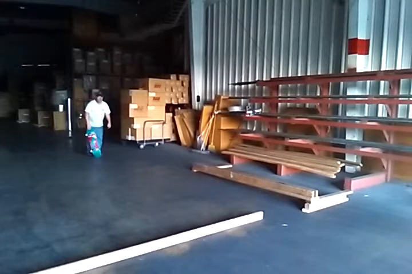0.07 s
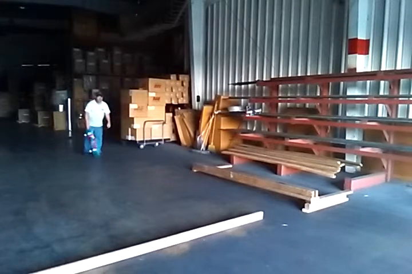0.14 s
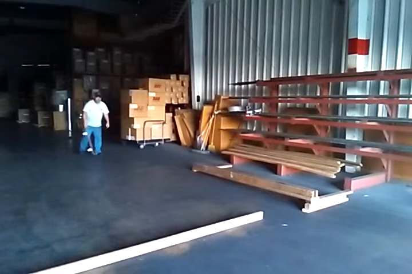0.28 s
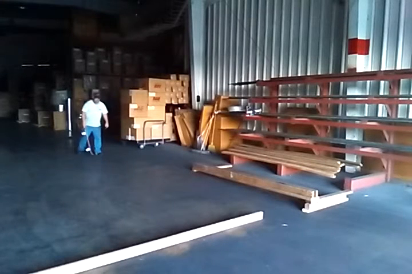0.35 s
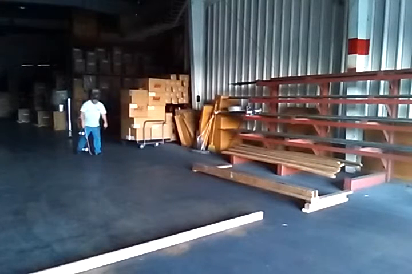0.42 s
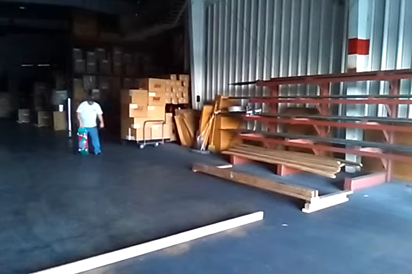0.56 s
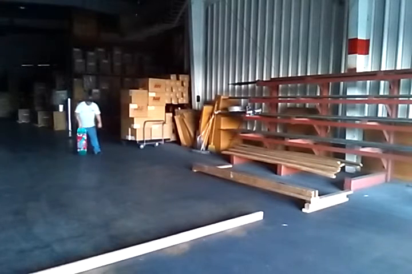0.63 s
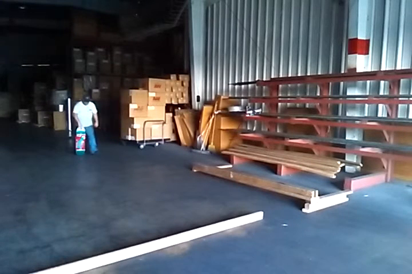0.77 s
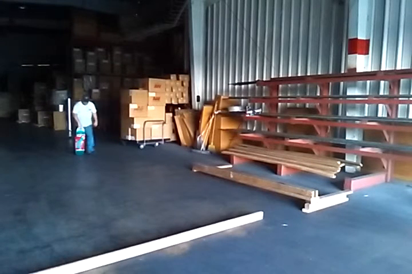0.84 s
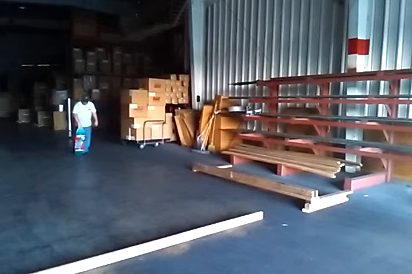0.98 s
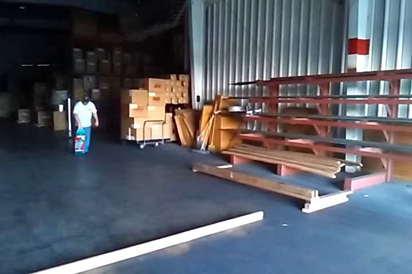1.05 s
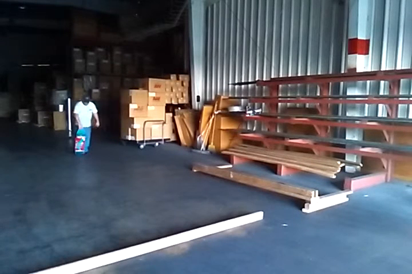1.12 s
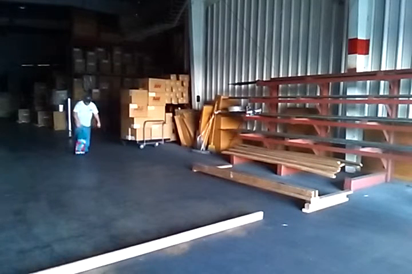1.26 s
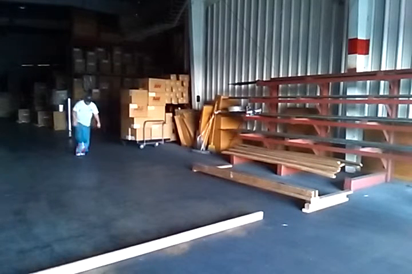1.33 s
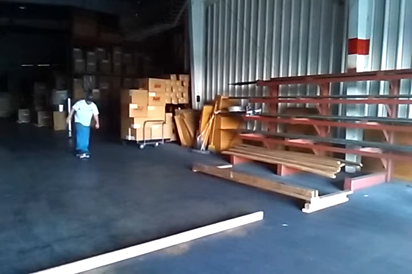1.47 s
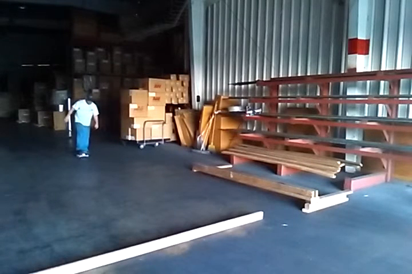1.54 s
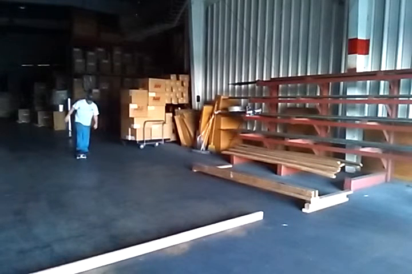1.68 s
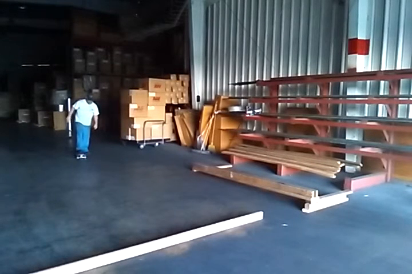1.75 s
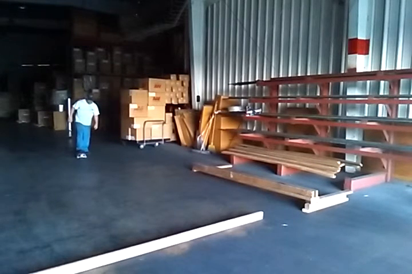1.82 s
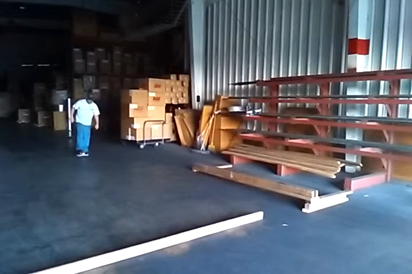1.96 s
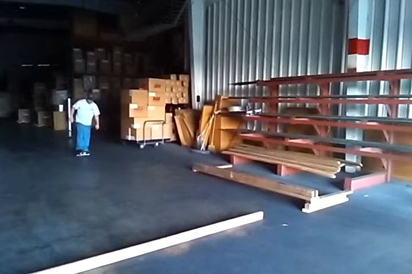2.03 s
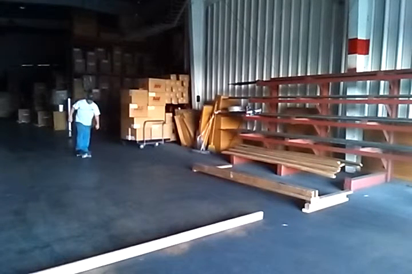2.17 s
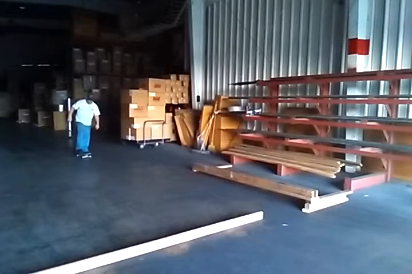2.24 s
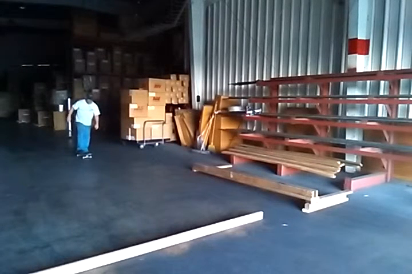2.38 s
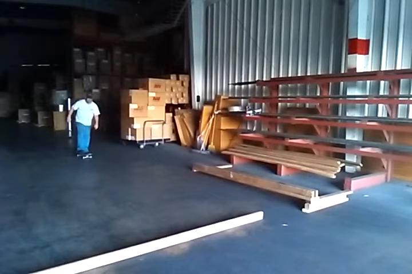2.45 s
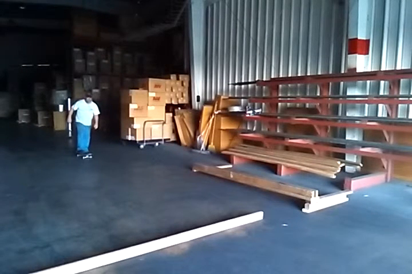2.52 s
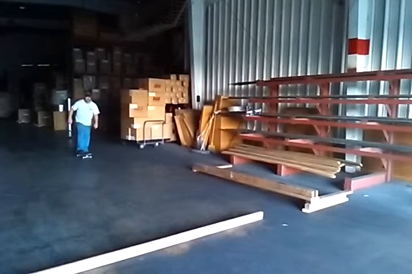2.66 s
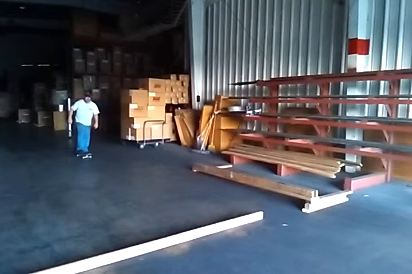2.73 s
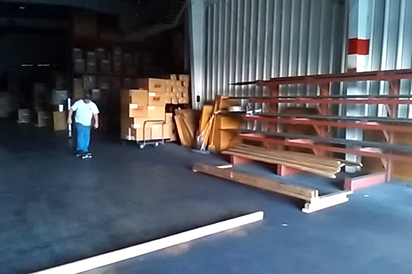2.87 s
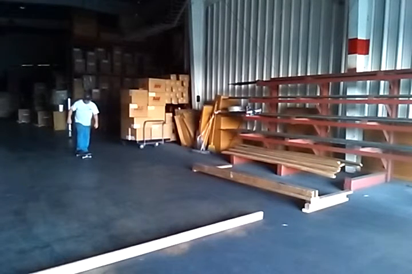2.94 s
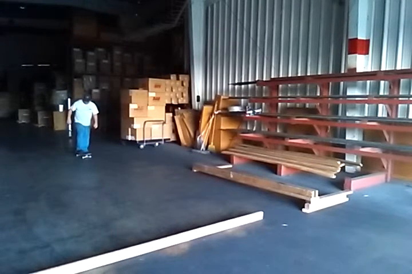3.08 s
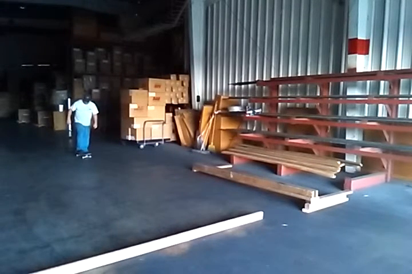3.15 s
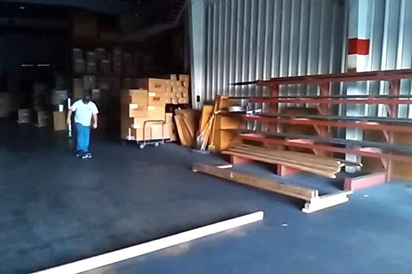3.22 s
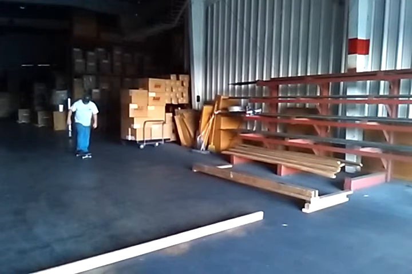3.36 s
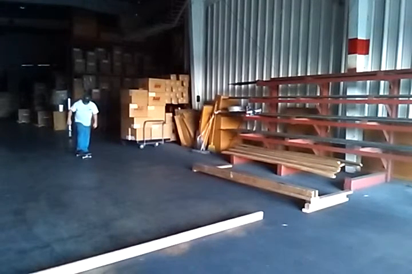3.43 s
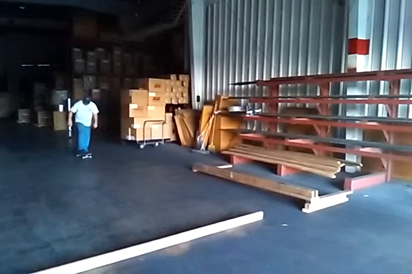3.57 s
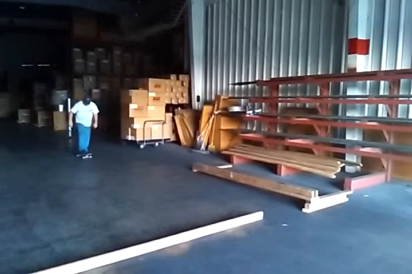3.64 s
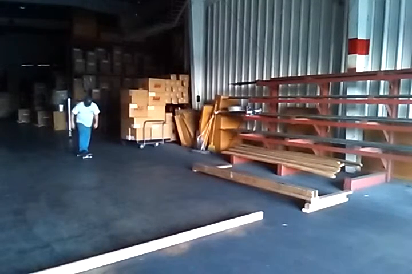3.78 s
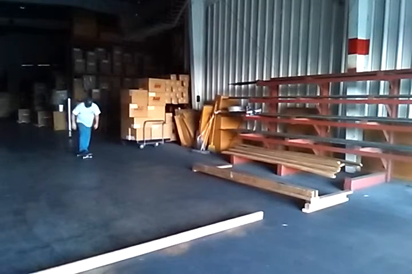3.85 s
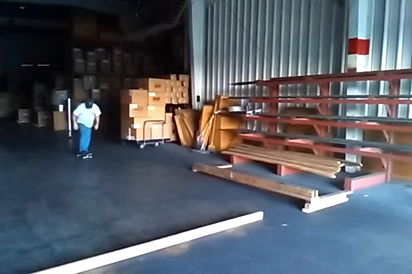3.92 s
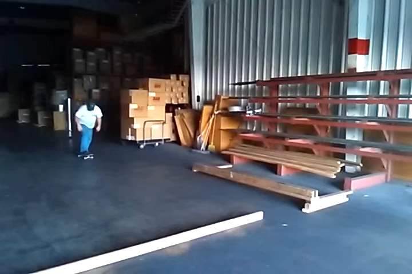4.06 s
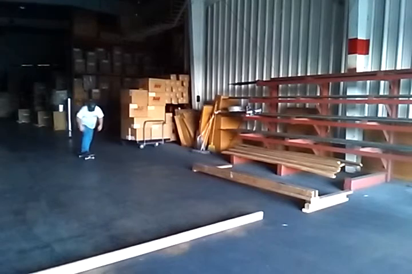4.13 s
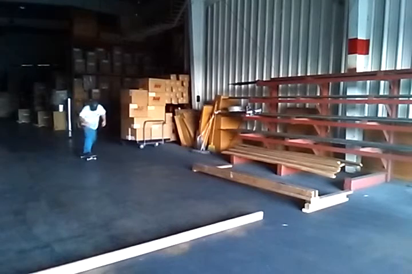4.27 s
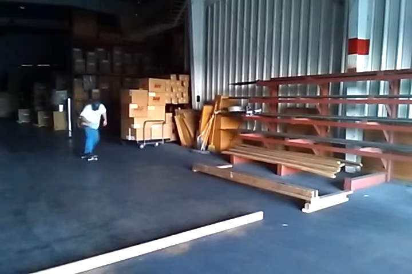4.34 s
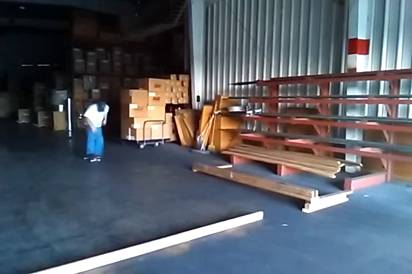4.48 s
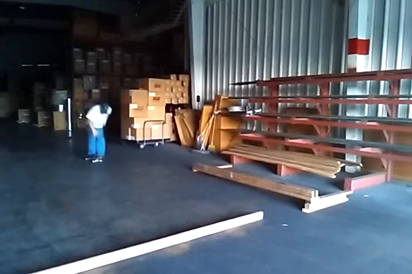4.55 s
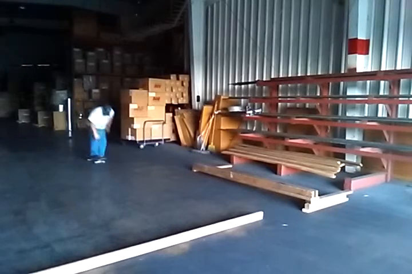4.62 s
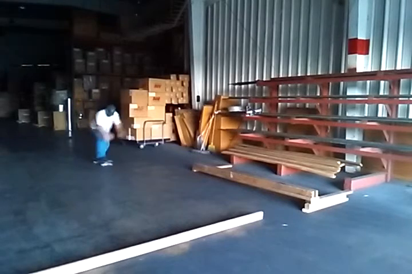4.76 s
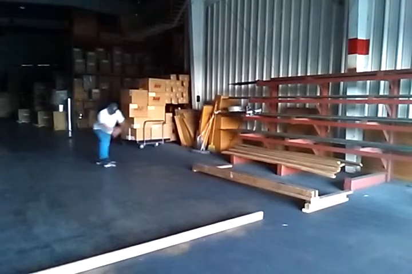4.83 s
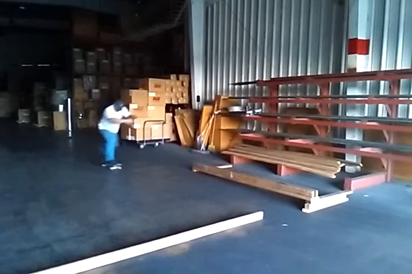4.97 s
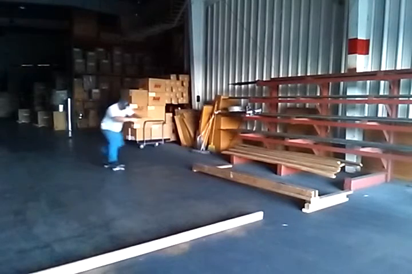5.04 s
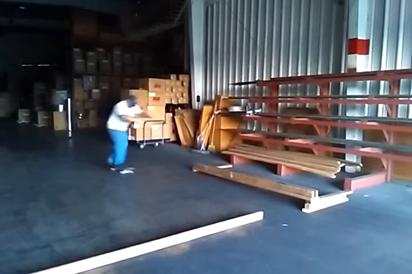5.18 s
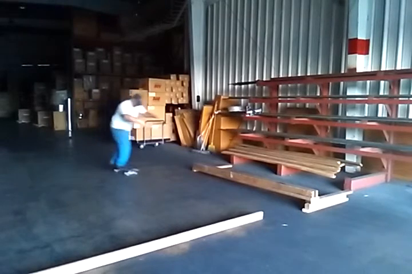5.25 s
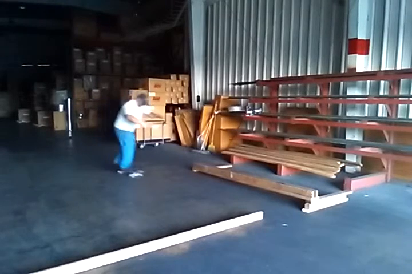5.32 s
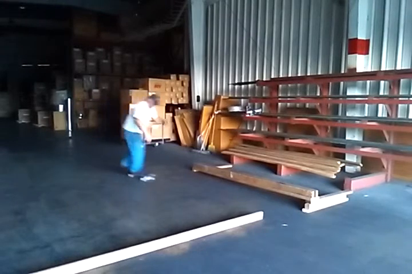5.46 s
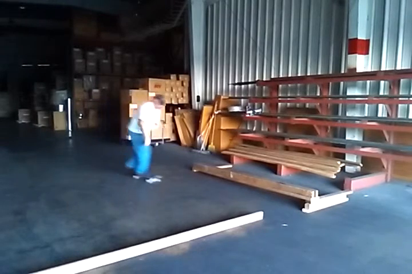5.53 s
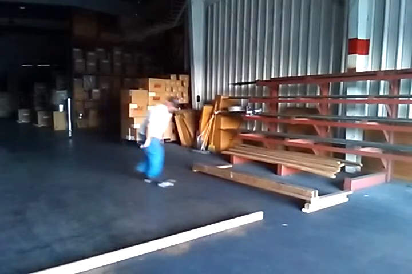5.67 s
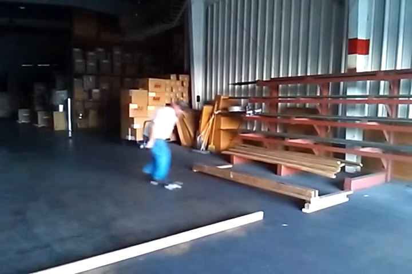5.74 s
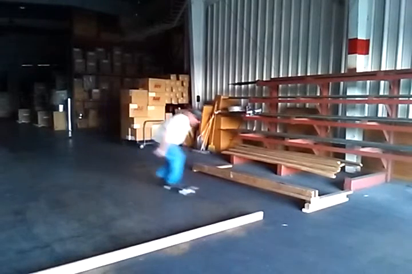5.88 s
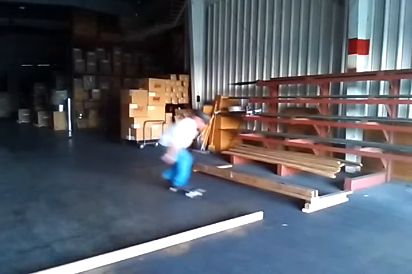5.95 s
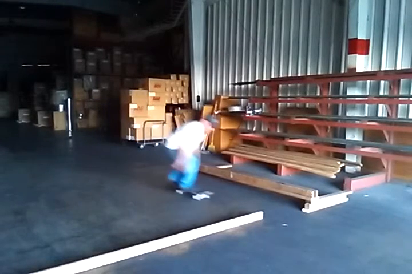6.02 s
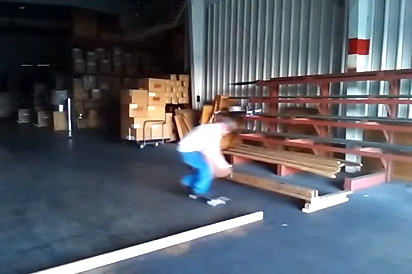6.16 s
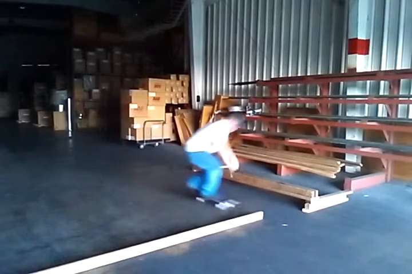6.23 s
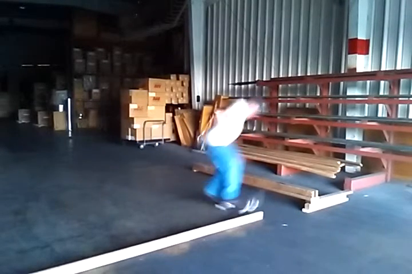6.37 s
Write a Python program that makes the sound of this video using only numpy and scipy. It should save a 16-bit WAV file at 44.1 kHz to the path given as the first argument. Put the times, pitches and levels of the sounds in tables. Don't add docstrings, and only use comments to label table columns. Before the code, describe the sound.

In a large open warehouse, a skateboard is dropped on concrete: a faint scuff, two loud sharp clacks, then smaller rattling knocks, each with a long hall echo. A quiet pause follows with distant birds chirping. Then scrapes and knocks as the rider pushes off, and wheels rumble grittily closer. Distant fixed microphone with slight low wind puffs, strongest early.

```python
import sys
import numpy as np
from scipy import signal
from scipy.fft import rfft, irfft, next_fast_len
from scipy.io import wavfile
from scipy.ndimage import uniform_filter1d

SR = 44100
rng = np.random.default_rng(int(sys.argv[2]) if len(sys.argv) > 2 else 0)


def output_pcm(signal):
    pcm = np.clip(np.atleast_2d(signal).T, -1, 1) * 32767
    wavfile.write(sys.argv[1], SR, np.round(pcm).astype(np.int16))


def level_to_linear(level):
    exponent = np.asarray(level, float) / 20
    return 10 ** exponent


N = 282543


def evened(x):
    return x / np.sqrt(np.mean(x ** 2) + 1e-20)


def read(points, hz):
    point_hz, value = np.transpose(points)
    return np.interp(np.log(hz + 1), np.log(point_hz + 1), value)


def along(rows):
    return np.interp(np.arange(N) / SR, *np.transpose(rows))


def add(mix, start_s, sound):
    part = mix[round(start_s * SR):][:len(sound)]
    part += sound[:len(part)]


def coloured(x, points):
    size = next_fast_len(len(x))
    hz = np.fft.rfftfreq(size, 1 / SR)
    skirt_db = -30 * np.log2(np.maximum(hz / points[-1][0], 1))
    return irfft(rfft(x, size) * level_to_linear(read(points, hz) + skirt_db), size)[:len(x)]


def resonate(x, hz, width_hz):
    turn = np.exp(2j * np.pi * np.cumsum(hz * np.ones(len(x))) / SR)
    r = np.exp(-np.pi * width_hz / SR)
    return 2 * (turn * signal.lfilter([1 - r], [1, -r], x / turn + 1e-18)).real


def gritty(spread_db, per_s):
    size = level_to_linear(spread_db * np.minimum(rng.exponential(1, N), 5))
    grains = size * (rng.random(N) < per_s / SR) * rng.choice([-1., 1.], N)
    return evened(grains) + 1.41 * rng.standard_normal(N)


def drift(shape, size):
    once = uniform_filter1d(rng.standard_normal(shape), size=size)
    return evened(uniform_filter1d(once, size=size))


def swells(peak_s, rise_s, fall_s, peak_db):
    out, t = np.zeros(N), np.arange(N) / SR
    for s, up_s, down_s, db in zip(peak_s, rise_s, fall_s, peak_db):
        away = np.maximum((s - t) / max(up_s, 1e-3), (t - s) / max(down_s, 1e-3))
        out += level_to_linear(db - 27.5 * away)
    return out


def blow(points, tilt_db, hz, hump_db, spread_octaves):
    f = np.fft.rfftfreq(1024, 1 / SR) + 1
    octaves = np.log2(f / hz)
    hump = hump_db * np.exp(-(octaves / spread_octaves) ** 2)
    level_db = read(points, f) + tilt_db * np.clip(octaves, -2, 2) + hump
    pulse = np.roll(irfft(level_to_linear(level_db)), 200)
    return pulse / np.linalg.norm(pulse)


def rings(rows):
    out = np.zeros(N)
    for start_s, length_s, hz, width_hz, db in rows:
        size = min(round(length_s * SR), 12000)
        t = np.arange(size) / SR
        noisy = evened(resonate(resonate(rng.standard_normal(size), hz, width_hz), hz, width_hz))
        plain = np.exp(-length_s * width_hz / 6)
        mode = (1 - plain) * noisy + 2 * plain * np.sin(2 * np.pi * hz * t)
        fade_db = 4.5 * t / length_s
        add(out, start_s, level_to_linear(db + 2 - fade_db) * evened(mode) * signal.windows.tukey(size, .5))
    return out


def glides(rows):
    out = np.zeros(N)
    for start_s, length_s, first_hz, last_hz, db in rows:
        size = round(length_s * SR)
        wobble, flutter = drift((2, 12000), 400)[:, :size]
        pitch_hz = np.linspace(first_hz, last_hz, size) * (1 + .008 * wobble)
        tone = np.sin(2 * np.pi * np.cumsum(pitch_hz) / SR)
        add(out, start_s, level_to_linear(db + 3 + 2.5 * flutter) * tone * signal.windows.tukey(size, .5))
    return out


def hall(x):
    # frequency in Hz, t60 in seconds.
    decay = [(150, 1.5), (400, 1.0), (1000, .93), (2000, 1.25), (3500, 1.4), (6000, 1.25), (11000, .87)]
    # delay in seconds, level over the plain decay in dB.
    build_up = [(0, -0.5), (.004, -0.5), (.028, 4), (.036, 4), (.07, 3), (.25, 1.8), (0.399, -6.5),
                (.7, -0.5), (1.5, 16)]
    taps = np.zeros(2 * SR)
    at = np.arange(0, 2 * SR - 12, 12)
    taps[at + rng.integers(0, 12, len(at))] = rng.choice([-1., 1.], len(at))
    hz, t, z = signal.stft(taps, SR, nperseg=256)
    t60_s = np.maximum(read(decay, hz), .2)[:, None]
    tail = signal.istft(z * level_to_linear(-60 * t / t60_s), SR, nperseg=256)[1]
    tail = tail * level_to_linear(np.interp(np.arange(len(tail)) / SR, *np.transpose(build_up)))
    return signal.fftconvolve(x, tail / np.linalg.norm(tail))[:N]


def quiet_air():
    # frequency in Hz, density in dB per Hz.
    air_spectrum = [(150, -20), (250, -1), (500, -2), (1000, -4), (1300, -6), (1700, -10.5), (2500, -14),
                    (4000, -17.5), (6300, -21), (8000, -21), (11300, -18), (13000, -20.5), (14500, -25)]
    return level_to_linear(-65.5) * evened(coloured(rng.standard_normal(N), air_spectrum))


def wind():
    # time in seconds, level in dB.
    gusts = [(0, -43), (.6, -48.5), (1.1, -49), (1.6, -51.5), (2.2, -54), (2.8, -56), (3.4, -59),
             (4.0, -58.5), (4.4, -58.5), (4.6, -63), (5.0, -60.5), (5.4, -58.5), (6.41, -58.5)]
    # start in seconds, peak in dB, frequency in Hz, length in seconds.
    puffs = [
        (0.059, -30.5, 60, 0.029),
        (0.592, -30, 59.7, 0.016),
        (0.606, -32, 142, 0.013),
        (0.718, -35, 53.5, 0.02),
        (0.966, -34, 52, 0.024),
        (1.249, -35, 73, 0.033),
        (1.332, -37, 49, 0.024),
        (1.71, -37, 62, 0.028),
        (2.147, -33.5, 58, 0.014),
        (6.303, -36, 175, 0.02),
    ]
    lumps = level_to_linear(0.612 * evened(coloured(rng.standard_normal(N), [(2, -2.5), (6, 3.0), (20, 4), (40, -42.5)])))
    low = coloured(rng.standard_normal(N) * lumps,
                   [(10, -20), (25, -3), (40, -2), (56, .1), (75, -4), (110, -24)])
    drone = coloured(rng.standard_normal(N) * lumps,
                     [(60, 3.5), (95, -4.5), (135, 2.5), (200, -11.5), (300, -15), (450, -44.0)])
    gust_db = along(gusts)
    drone_db = -53.5 + 0.25 * (gust_db + 55)
    out = evened(low) * level_to_linear(gust_db) + evened(drone) * level_to_linear(drone_db)
    for start_s, db, hz, length_s in puffs:
        u = np.arange(0, 1, 1 / (SR * length_s))
        add(out, start_s - .005, level_to_linear(db) * np.sin(2 * np.pi * hz * length_s * u) * np.sin(np.pi * u))
    return out


def birds():
    # peak in seconds, rise in seconds, fall in seconds, level in dB.
    chatter = [
        (0.04, 0.25, 3.3, -72),
        (2.59, .9, 0.79, -65),
        (1.8, 1.074, 1.5, -72.5),
        (3.84, 1.04, 0.77, -75),
        (4.62, 1.2, .5, -73),
    ]
    # start in seconds, length in seconds, first Hz, last Hz, level in dB.
    whistles = [(.15, .2, 2130, 2110, -74), (.3, .25, 2110, 2100, -73), (4.86, .07, 6270, 6250, -76),
                (6.11, .07, 2980, 2780, -70), (.03, .1, 2750, 3080, -72), (.13, .09, 3080, 3150, -75),
                (.455, .11, 3640, 3300, -70), (.575, .055, 2800, 2250, -74), (.615, .065, 2340, 2290, -73),
                (.53, .065, 2350, 2780, -73), (1.35, .055, 3200, 3700, -72), (4.08, .14, 3080, 2950, -77),
                (4.28, .15, 4580, 4340, -79), (4.38, .2, 4390, 4370, -79), (4.38, .07, 2600, 2650, -77),
                (4.6, .2, 5500, 5450, -74), (4.78, .17, 4840, 4820, -74), (4.98, .19, 3500, 3480, -69),
                (5.09, .08, 3660, 3660, -74), (5.575, .07, 3230, 2880, -66), (5.63, .05, 2870, 2900, -65),
                (5.665, .1, 3620, 3300, -73), (5.68, .08, 3620, 3580, -71), (5.73, .09, 3010, 2860, -67),
                (5.785, .11, 2850, 3230, -67), (5.76, .11, 3450, 3200, -69), (5.74, .06, 6250, 6300, -75),
                (6.14, .08, 3400, 3350, -67), (6.22, .06, 3450, 3500, -69)]
    flock = coloured(gritty(spread_db=3.5, per_s=1700),
                     [(1500, -32.0), (2100, 12.5), (2500, 4.0), (3000, 15.0), (3500, 7.0), (3900, -22.0)])
    out = evened(flock) * swells(*np.transpose(chatter))
    for start_s, length_s, first_hz, last_hz, db in whistles:
        size = round(length_s * SR)
        pitch_hz = np.linspace(first_hz, last_hz, size) + 16 * drift(size, 500)
        blur = resonate(resonate(rng.standard_normal(size), pitch_hz, 190), pitch_hz, 190)
        flutter_db = 2.5 * np.clip(drift(size, 350), -2, 1)
        tone = level_to_linear(flutter_db) * np.sin(2 * np.pi * np.cumsum(pitch_hz) / SR)
        whistle = .8 * tone + .45 * evened(blur)
        add(out, start_s, 1.2 * level_to_linear(db) * whistle * signal.windows.tukey(size, .4))
    return out


def singing_bands():
    # start in seconds, length in seconds, frequency in Hz, width in Hz, level in dB.
    songs = [(.13, .27, 4640, 330, -66), (.17, .17, 5300, 380, -66), (.8, 0.27, 3000, 800, -64),
             (1.7322, .0016, 7940, 1944, -25), (1.739, 0.006, 8500, 3000, -37),
             (1.5191, .0011, 11000, 3000, -20), (4.592, 0.082, 5450, 200, -68), (4.6, .13, 4750, 220, -74),
             (4.408, 0.15, 3780, 1188, -73.5), (4.953, 0.16, 7600, 1300, -65),
             (4.9482, 0.0014, 9550, 1300, -34), (4.9482, 0.0016, 7440, 900, -41.5),
             (4.954, .12, 10500, 800, -59), (4.954, 0.066, 9400, 1000, -60),
             (4.954, 0.054, 11900, 700, -59), (4.96, 0.091, 12700, 700, -69), (5.055, .06, 12000, 900, -66),
             (6.084, 0.11, 6500, 500, -72)]
    return rings(songs)


def scuffs():
    # peak in seconds, rise in seconds, fall in seconds, level in dB, upper band relative in dB.
    rubs = [(.14, 0.095, 0.26, -66.5, 19.5), (.262, 0.24, 0.29, -51.5, 0), (.71, .02, .5, -57, -9.5),
            (.88, 0.06, 0.49, -61, -10), (1.06, 0.44, 0.058, -61, 6.5), (3.56, 0.16, 0.6, -69, -4.5),
            (3.9, .5, .5, -82, 8.5), (4.5, 0.64, .25, -77.5, 8), (4.599, .02, 0.15, -55, 0),
            (4.89, 0.23, 0.2, -72, 10), (4.985, 0.052, 0.14, -72, 11), (5.19, 0.027, 0.3, -59.5, 6),
            (5.3, 0.22, 0.29, -53.5, 2.5), (5.7, 0.7, 0.84, -70.5, 11.5), (5.85, .3, 1, -82, 16),
            (6.105, 0.056, 0.13, -66, 15), (6.41, 0.3, .1, -62.5, 11)]
    # frequency in Hz, density in dB per Hz.
    sole = [(2000, -12), (3000, -4), (4000, -3), (5000, -2), (6500, -5), (7800, -16.5), (9500, -21)]
    # frequency in Hz, density in dB per Hz.
    upper = [(6000, -24), (7500, -14), (9500, -6.5), (11200, 0.5), (13000, -7), (14400, -12)]
    grains = gritty(spread_db=6.0, per_s=5400)
    *shape, db, upper_db = np.transpose(rubs)
    out = evened(coloured(grains, sole)) * swells(*shape, db)
    return out + evened(coloured(grains, upper)) * swells(*shape, db + upper_db)


def crossing_bird():
    # start in seconds, length in seconds, first Hz, last Hz, level in dB.
    calls = [
        (5.575, .045, 3230, 3130, -66),
        (5.675, .075, 3440, 3000, -71),
        (5.715, .045, 3390, 3360, -68),
        (5.64, .05, 3300, 3440, -76),
        (5.84, .065, 3120, 3190, -70),
        (5.86, .05, 3000, 2900, -72),
        (.53, .06, 2300, 2760, -72),
        (.565, .04, 3300, 2850, -72),
    ]
    return glides(calls)


def deck_rings():
    # start in seconds, length in seconds, frequency in Hz, width in Hz, level in dB.
    deck_swells = [(0.6, 0.039, 282, 130, -48.5), (0.699, 0.11, 741, 40, -58),
                   (0.918, 0.12, 330, 90, -57.5), (0.944, 0.092, 1100, 95, -60),
                   (1.02, 0.088, 367, 60, -55.5), (1.411, 0.017, 1190, 380, -22.5),
                   (1.408, 0.026, 410, 150, -31), (1.522, 0.0022, 1070, 540, -17),
                   (1.541, 0.046, 730, 250, -27), (1.545, 0.022, 1750, 1200, -33),
                   (1.535, 0.05, 480, 170, -34), (1.734, .007, 1070, 200, -30),
                   (1.755, 0.065, 495, 40, -36.5), (1.53, 0.03, 1175, 70, -35),
                   (1.553, 0.12, 1600, 120, -42), (1.545, 0.11, 2000, 90, -44),
                   (2.272, 0.04, 1005, 60, -44), (2.284, 0.014, 520, 70, -38), (2.295, 0.045, 497, 90, -40),
                   (2.33, .05, 697, 30, -41), (2.29, 0.065, 1620, 80, -46), (2.28, 0.19, 1980, 120, -53),
                   (2.26, 0.16, 3200, 248, -50), (2.385, 0.085, 500, 60, -46),
                   (6.302, 0.01, 2000, 900, -51), (2.301, 0.2, 1360, 970, -43),
                   (2.44, 0.19, 1620, 970, -52), (1.412, .03, 496, 110, -34),
                   (5.3185, .005, 740, 660, -31.5), (2.674, 0.032, 1050, 120, -56),
                   (1.42, 0.03, 1040, 40, -36), (1.41, .016, 1310, 149.7, -29),
                   (1.516, .018, 728, 120, -28), (1.518, 0.012, 1070, 149.5, -27),
                   (3.46, 0.092, 2000, 300, -67), (3.473, 0.13, 1510, 300, -63.5),
                   (4.783, 0.025, 880, 600, -46.5), (5.342, 0.032, 516, 52, -36.5),
                   (5.965, 0.1, 490, 105, -50)]
    return rings(deck_swells)


def noise_bands():
    # start in seconds, length in seconds, frequency in Hz, width in Hz, level in dB.
    broad_swells = [(1.525, .13, 280, 150, -41), (2.59, .11, 1750, 900, -62),
                    (1.752, .04, 11000, 3000, -43), (4.956, .05, 11000, 3500, -56),
                    (3.4535, .008, 1100, 200, -52), (3.479, .016, 1960, 100, -57),
                    (5.1745, .004, 1800, 700, -40), (6.303, .009, 420, 300, -43),
                    (.678, .016, 340, 100, -53), (.677, .012, 1150, 150, -50), (2.42, .1, 400, 250, -51),
                    (4.96, .1, 160, 80, -57), (1.523, .022, 11500, 900, -35), (1.411, .02, 2100, 500, -38),
                    (2.7, .25, 5500, 2500, -72), (4.15, .45, 250, 80, -68)]
    return rings(broad_swells)


def ticks():
    # time in seconds, peak in dB, ring of the part in Hz, brightness in dB per octave, hall level in dB.
    hits = [(0.678, -38, 5830, -1.5, -2), (0.8696, -57, 5330, 6, 15), (1.4106, -12.5, 7370, -2, -3.5),
            (1.4144, -20, 6800, 2, -21), (1.5175, -11, 7350, 0, -23), (1.5203, -8, 7700, -0.5, -1),
            (1.7329, -20.5, 7700, -3.5, 2.5), (2.2622, -13.5, 10000, -3.5, -4.5),
            (2.3652, -30, 10400, -5, 0.5), (2.4, -27, 9900, -5, -2.5), (2.6773, -50, 8540, 2.5, 8.5),
            (2.6886, -46.5, 8500, -3, 6), (3.4546, -36, 7900, 1.5, -6), (4.5879, -46, 5440, 0, 4),
            (4.9492, -22.5, 9300, 6, -9), (4.9526, -33, 10300, 3, -20), (5.179, -43, 6500, -4, 10),
            (5.589, -40.5, 10400, 7, -2), (6.092, -36, 7560, -0.5, 1.5), (6.3032, -40, 4700, -8, -8)]
    # frequency in Hz, level in dB.
    clack = [(700, -80.5), (1800, -31.5), (2800, -2.5), (4000, -8), (6000, -5), (8000, -4), (9500, -3),
             (11300, 2.5), (13000, -6), (14500, -10)]
    dry, send = np.zeros(N), np.zeros(N)
    t, after = np.arange(150) / SR, np.arange(3000) / SR
    for s, db, hz, tilt_db, wet_db in hits:
        click = blow(clack, tilt_db, hz, 2.5, 0.063)
        direct = blow(clack, 0.65 * tilt_db + 2.0, hz, 5.0, 0.26)
        tick = np.convolve(direct, rng.standard_normal(len(t)) * t * np.exp(-t / .00022))
        shiver = np.convolve(direct, rng.standard_normal(len(after)) * np.exp(-after / 0.013))
        add(dry, s - .0049, tick * level_to_linear(db) / abs(tick).max())
        add(dry, s - .004, shiver * level_to_linear(db - 18 + 0.35 * min(wet_db, 0)))
        add(send, s - .0046, click * level_to_linear(db + 13.0 + wet_db))
    return dry, send


def knocks():
    # time in seconds, peak in dB, brightness in dB per octave, hall level in dB, hall thud in Hz.
    blows = [(0.679, -38, 7, 3.5, 1160), (1.4105, -12, 0.1, 0.7, 1230), (1.4162, -23, 8.5, -15, 1070),
             (1.5195, -23, 0, -23, 1100), (1.5227, -11, 0.5, 4.8, 1080), (1.734, -23.5, 2.5, 6.5, 1010),
             (2.263, -24.5, -4, 9.5, 990), (2.689, -47, 6.5, 9, 1060), (3.454, -42.5, 6.5, 4.5, 1840),
             (4.78, -42.5, -3, 7.5, 800), (4.951, -30, -10, -5, 584), (5.175, -35, 2.5, 6.5, 790),
             (5.3196, -26, -7, 3, 554), (5.957, -48.5, -19, 5, 434), (6.304, -38, -3, 8.5, 414)]
    # frequency in Hz, level in dB, t60 in seconds.
    modes = [(308, 0, 0.036), (488, 1, 0.036), (703, 8.5, 0.031), (910, 9, 0.017), (1066, 10.5, 0.033),
             (1320, 2.5, 0.041), (1577, 5, 0.05), (2000, -1, 0.028), (2200, -11.5, 0.0065),
             (3160, -11, 0.046)]
    # frequency in Hz, level in dB.
    boom = [(40, -74), (100, -17.5), (170, -4), (300, -4.5), (500, 7), (1100, 2.5), (1700, 2.5), (2300, -1),
            (3200, -25.5), (4000, -18.5), (7000, -57)]
    dry, send, t = np.zeros(N), np.zeros(N), np.arange(3000) / SR
    hz, mode_db, t60_s = np.transpose(modes)[:, :, None]
    for s, db, tilt_db, wet_db, thud_hz in blows:
        detune, mix = rng.standard_normal((2, len(modes), 1))
        gains = level_to_linear(mode_db + tilt_db * np.log2(hz / 1000) + 0.46 * mix - 60 * t / t60_s)
        tones = np.sin(2 * np.pi * hz * (1 + .015 * detune) * t)
        knock = (gains * tones).sum(0) * (1 - np.exp(-t / 0.0003))
        knock *= level_to_linear(db) / abs(knock).max()
        add(dry, s - .0005, knock)
        add(send, s, 0.58 * knock * level_to_linear(wet_db))
        slap = blow(boom, tilt_db, thud_hz, 4, .25)
        add(dry, s - .004, 0.22 * level_to_linear(db) * slap / slap.max())
        add(send, s - .004, slap * level_to_linear(db + 16.0 + wet_db))
    return dry, send


def rolling():
    # time in seconds, level in dB.
    roll = [(3.6, -73), (3.71, -64), (4.0, -65), (4.3, -62.5), (4.56, -64.5), (4.9, -56.5), (5.4, -41.5),
            (5.7, -45.5), (6.41, -41)]
    # frequency in Hz, width in Hz, level in dB.
    resonances = [(523, 40, 10), (564, 40, 8), (752, 43, 12), (840, 60, 4)]
    # peak in seconds, rise in seconds, fall in seconds, rumble in dB, grit relative in dB.
    presses = [(.72, 0.06, 0.88, -68, 14), (1.03, 0.49, 0.079, -62, 12), (2.69, 0.029, 0.14, -56.5, -0.5),
               (3.46, 0.023, 0.27, -70.5, 13), (4.79, 0.39, 0.096, -44, -21),
               (4.859, 0.036, 0.085, -42.5, -25), (4.985, 0.091, 0.11, -45, -8),
               (5.23, 0.076, 0.24, -53.5, -6.5), (5.322, 0.007, 0.024, -27.5, -15),
               (5.36, 0.065, .06, -38.5, -10), (6.02, 0.07, 0.35, -59, -38)]
    road = gritty(spread_db=1.5, per_s=550)
    ringing = sum(level_to_linear(db) * evened(resonate(road, hz, width_hz)) for hz, width_hz, db in resonances)
    broad = coloured(road, [(300, -56), (430, 3.0), (600, 0.0), (1300, -9), (2000, -17.0)])
    body = 0.64 * evened(ringing) + 0.98 * evened(broad)
    fine = coloured(gritty(spread_db=3.0, per_s=1500),
                    [(900, 1.5), (1400, -2.0), (2300, -1.5), (3400, -15), (4500, -89.5)])
    growl = coloured(gritty(spread_db=3.5, per_s=350),
                     [(130, -9.5), (210, 0.0), (270, 1), (340, -4.5), (420, -2.5), (550, -63.0)])
    roll_db = along(roll)
    fine_db = -58.5 + 0.77 * (roll_db + 45)
    growl_db = -53.5 + 0.9 * (roll_db + 49.5)
    *shape, db, grit_db = np.transpose(presses)
    out = evened(body) * (level_to_linear(roll_db) + swells(*shape, db))
    out += evened(fine) * (level_to_linear(fine_db) + swells(*shape, db + grit_db))
    return out + evened(growl) * (level_to_linear(growl_db) + swells(*shape, db - 21))


def knock_tails():
    # start in seconds, length in seconds, first Hz, last Hz, level in dB.
    tail_modes = [(1.4145, .008, 1290, 1280, -25), (1.43, .035, 1040, 1050, -35),
                  (1.545, .028, 1930, 1915, -34), (1.575, .045, 1135, 1085, -33),
                  (1.635, .035, 1105, 1090, -36), (1.675, .05, 1110, 1100, -41),
                  (1.575, .045, 445, 475, -33), (1.635, .045, 455, 470, -41),
                  (1.755, .035, 1600, 1595, -43), (1.82, .04, 1590, 1600, -48), (1.835, .07, 500, 490, -51),
                  (1.66, .04, 1500, 1500, -44), (2.2625, .012, 1000, 1015, -35),
                  (2.2625, .012, 700, 700, -37), (2.39, .055, 1950, 1960, -50), (2.485, .03, 530, 525, -53),
                  (2.71, .024, 1935, 1930, -56), (2.375, .035, 1135, 1130, -48)]
    return glides(tail_modes)


def deck_hums():
    # start in seconds, length in seconds, first Hz, last Hz, level in dB.
    bent_modes = [(4.765, .06, 480, 500, -53), (4.8, .075, 550, 515, -53), (4.965, .085, 778, 765, -55),
                  (4.985, .15, 568, 570, -59), (5.17, .14, 548, 575, -57), (5.37, .12, 545, 545, -44),
                  (5.47, .125, 540, 495, -49), (5.4, .13, 280, 265, -52), (5.64, .125, 465, 420, -57),
                  (5.76, .1, 510, 516, -52), (5.94, .05, 420, 435, -52), (6.0, .045, 545, 550, -46),
                  (6.055, .055, 530, 545, -48), (6.125, .055, 520, 500, -47), (6.18, .07, 565, 590, -53),
                  (6.02, .18, 805, 855, -60), (6.16, .11, 335, 295, -54)]
    return glides(bent_modes)


def scene():
    song = birds()
    moving = scuffs() + rolling()
    tick, tick_send = ticks()
    knock, knock_send = knocks()
    mid = tick + knock + 0.54 * moving + song
    mid += hall(tick_send) + hall(knock_send) + level_to_linear(-9.5) * hall(moving + song)
    mid += singing_bands() + deck_rings() + noise_bands()
    mid += crossing_bird() + knock_tails() + deck_hums()
    return np.tile(mid + quiet_air() + wind(), (2, 1))


def roll_off(x):
    return signal.sosfilt(signal.butter(12, 14880, fs=SR, output="sos"), x)


def record(dry):
    # frequency in Hz, level in dB.
    apart = [(2800, -65), (3600, -35.5), (4500, -24), (7800, -2.5), (11500, -3), (14000, -4)]
    z = signal.stft(dry[0], nperseg=128, noverlap=96)[2]
    random_phase = np.exp(2j * np.pi * rng.random(z.shape[::-1]).T)
    other = signal.istft(z * random_phase, nperseg=128, noverlap=96)[1][:N]
    side = coloured(1.54 * other, apart)
    edge = signal.firwin(601, 14280, window=("kaiser", 7), fs=SR)  # lowpass, Hz
    pair = signal.oaconvolve(dry + np.array([side, -side]), edge[None], "same", axes=1)
    return roll_off(pair)


dry = scene()
out = record(dry)
output_pcm(out)
```